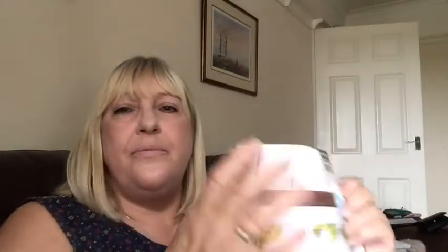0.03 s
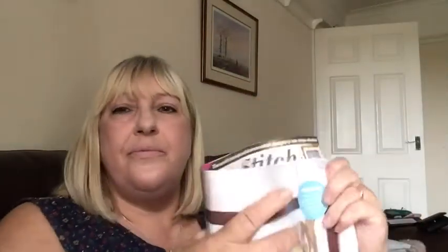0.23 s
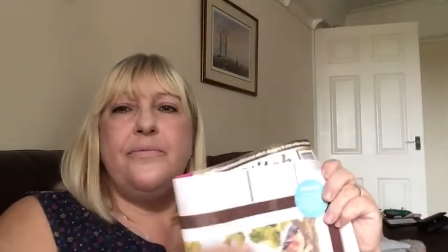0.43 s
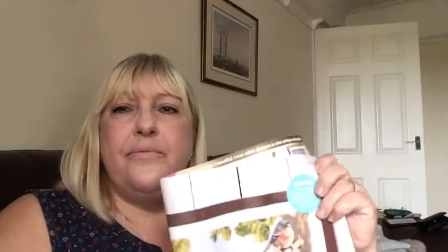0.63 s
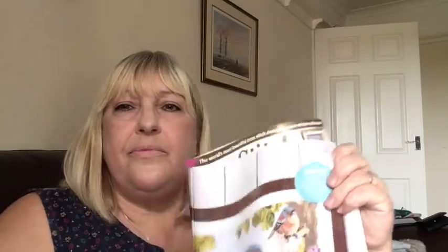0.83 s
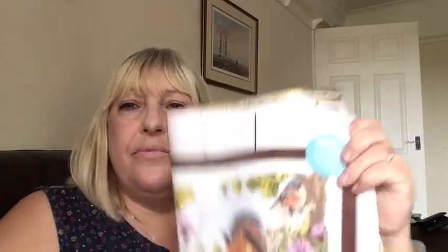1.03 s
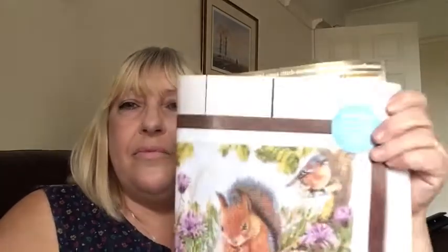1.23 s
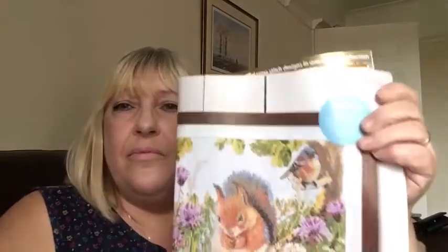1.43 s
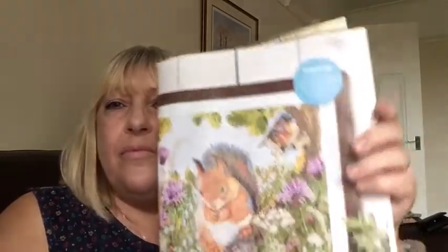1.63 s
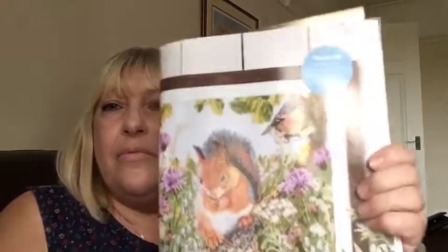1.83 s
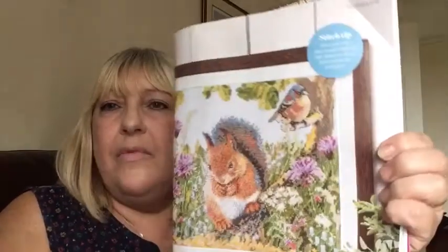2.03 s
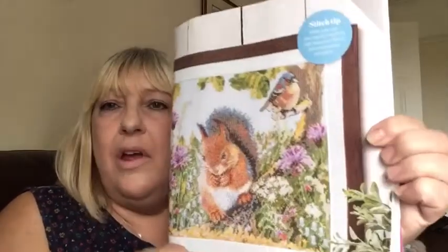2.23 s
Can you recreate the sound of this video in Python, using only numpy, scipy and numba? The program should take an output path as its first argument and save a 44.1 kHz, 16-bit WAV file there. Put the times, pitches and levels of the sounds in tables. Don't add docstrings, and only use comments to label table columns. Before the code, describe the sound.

Glossy magazine handled and turned over, cover popping and crackling, fingers sliding, in a small room

```python
import sys
import numpy as np
from scipy import signal
from scipy.fft import rfft, irfft
from scipy.io import wavfile
from scipy.ndimage import uniform_filter1d
from numba import njit

SR = 44100
rng = np.random.default_rng(int(sys.argv[2]) if len(sys.argv) > 2 else 0)


def dump_mix(stems):
    frames = np.atleast_2d(stems).T
    limited = np.clip(frames, -1, 1)
    pcm = np.round(limited * 32767).astype(np.int16)
    wavfile.write(sys.argv[1], SR, pcm)


def field_ratio(decibels):
    return 10 ** (np.asarray(decibels, dtype=float) / 20)


N = 100283

# (time [s], resonance [Hz])
SHEET_NOTE = [
    (.2,600),
    (.33,525),
    (.5,703),
    (1.0,720),
    (1.15,590),
]


def level(x):
    return x / np.sqrt(np.mean(x ** 2))


@njit
def svf(x, hz, ratio):
    y, band_state, low_state = np.empty(len(x)), 0., 0.
    for i in range(len(x)):
        g = np.tan(np.pi * hz[i] / SR)
        v = (band_state + g * (x[i] - low_state)) / (1 + g * (g + ratio))
        band_state = 2 * v - band_state
        low_state = low_state + 2 * g * v
        y[i] = ratio * v
    return y


def band(x, hz, ratio):
    hz = np.clip(hz + np.zeros(len(x)), 20, 0.42 * SR)
    once = svf(x, hz, float(ratio))
    return svf(once, hz, float(ratio))


def colour(x, table):
    f = np.fft.rfftfreq(len(x), 1 / SR) + 1
    hz, db = np.array(table).T
    gain = field_ratio(np.interp(np.log(f), np.log(hz), db))
    return level(irfft(rfft(x) * gain, len(x)))


def curve(table, axis):
    table = np.array(table)
    return np.interp(np.arange(N) / SR, table[:, 0], table[:, axis])


def walk(rate):
    k = int(SR / rate)
    steps = np.repeat(rng.standard_normal(N // k + 1), k)
    return 1.7 * uniform_filter1d(uniform_filter1d(steps, k), k)[:N]


def grit(scatter_db):
    return level(rng.standard_normal(N) * field_ratio(scatter_db * rng.exponential(size=N)))


def add(out, s, x):
    i = int(s * SR)
    out[i:i + len(x)] += x[:N - i]


def bursts(table, scatter_db, attack_share):
    snap_hz, treble_hz = 4350, 9440
    out, t = np.zeros(N), np.arange(3000) / SR
    chance = rng.standard_normal((len(table), 2, len(t)))
    for (s, db, treble_db, ms), (slips, size) in zip(table, chance):
        tau = max(ms, 0.2) / 1000
        swell = 1 - np.exp(-t / (attack_share * tau))
        run = slips * field_ratio(scatter_db * size) * swell * np.exp(-t / tau)
        mid = band(run, snap_hz * 2 ** np.clip(treble_db / 30, -1, 0.5), 2.1)
        top = band(run, treble_hz * 2 ** np.clip(treble_db / 20, 0, 0.5), 1.3)
        mid, top = mid / np.abs(mid).max(), top / np.abs(top).max()
        add(out, s, field_ratio(db) * (mid + field_ratio(treble_db - 0.5) * top))
    return out


def room_air():
    # (frequency [Hz], level [dB per Hz])
    air_colour = [(15, -37), (25, 7.5), (117, 0), (317, -0.5), (1260, -29), (2760, -10.5), (6050, -25),
                  (12200, -25), (16000, -67)]
    return colour(rng.standard_normal(N), air_colour) * field_ratio(-61)


def flex():
    # (time [s], level [dB], centre [octaves above 500 Hz])
    bending = [(0,-52.5,0.6),(.12,-56.5,1.2),(.21,-62,0.3),(.27,-49.5,1.18),(.36,-62,1.25),(.52,-60,0.22),(.6,-57.5,0.64),(.68,-77,1.3),(.8,-67,0.24),(.9,-53,1.6),(1.01,-65,1.44),(1.15,-65,0.56),(1.25,-58,1.7),(1.3,-70.5,1.3),(1.6,-68.5,0.72),(1.8,-76,0.58),(2.1,-67.5,0.7),(2.27,-73.5,0.77)]
    hz, slips = 500 * 2 ** curve(bending, axis=2), grit(1.58)
    wide = level(band(slips, hz * 2 ** (0.057 * walk(24.6)), 1.2))
    ring_hz = curve(SHEET_NOTE, axis=1) * 2 ** (0.06 * walk(10))
    ring = level(band(slips, ring_hz, 0.25)) * field_ratio(-5)
    thud = level(band(grit(3), 150, 1.4)) * field_ratio(-3)
    crackle = wide * field_ratio(2 * walk(50)) + ring * field_ratio(2 * walk(35)) + thud * field_ratio(2 * walk(25))
    return field_ratio(curve(bending, axis=1)) * crackle


def pops():
    # (time [s], peak level [dB], centre [Hz], ring [ms], bass share [dB])
    buckles = [(.001,-43,154.6,18,-16),(0.0422,-32,1400,5.16,-6),(0.062,-36.5,395,7.5,-17),(0.1596,-39,610,12.2,-23),(0.1799,-32,608,6.4,-2),(.2405,-36.5,497,12,12),(0.3201,-19,567.6,4.98,-18.5),(.4605,-36.5,683,13,-5),(0.5567,-25.5,893,6.5,-0.5),(.5895,-36,734,5.7,-2),(.8164,-14.5,1535,4.39,-12),(0.8508,-31.5,1284,12.6,-6),(.8817,-19,1342,4.7,-16.5),(.9122,-32.5,1116,2.92,1),(1.0623,-39,1450,5,-4),(1.0934,-37,708,7.2,20.5),(1.1802,-38,574,10,-12),(1.2177,-36.5,546,15,-6),(1.3363,-42,384,6.7,0),(1.3903,-33.5,2630,1.467,0.5),(1.5123,-45.5,394,4.9,4),(1.5551,-41,580,7.7,7),(2.1099,-41,1770,5.2,-7),(2.2203,-50.5,192,7.4,-24)]
    spread_oct, bass_hz, bass_oct = 0.56, 205, 1.93
    lag_cycles, tail_db, tail_s, tail_rise_s = 2.5, -26, 0.024, 0.0056
    out, t, f = np.zeros(N), np.arange(8192) / SR, np.fft.rfftfreq(8192, 1 / SR) + 1
    chance = rng.random((len(buckles), 2, 14, 1))
    flutter = rng.standard_normal((len(buckles), len(t)))
    is_echo = np.arange(14)[:, None] > 0

    def hump(centre_hz, octaves):
        return np.exp(-(np.log2(f / centre_hz) / octaves) ** 2 / 2)

    for (s, db, hz, ms, bass_db), (place, sign), noise in zip(buckles, chance, flutter):
        bend = f / np.interp(s, *np.array(SHEET_NOTE).T)
        sheet = field_ratio(-0.5) / (1 + 7j * (bend - 1 / bend))
        lag = lag_cycles / hz
        late = ms / 400 * place ** 2 * is_echo
        size = np.where(late > 0, (2 * sign - 1) * np.exp(-late * 1000 / ms), 1)
        paths = np.sum(size * np.exp(-4j * np.pi * (lag + late) * np.sqrt(hz * f)), axis=0)
        body = hump(hz, spread_oct) * (1 + sheet)
        bass = field_ratio(bass_db + 2.5) * hump(bass_hz, bass_oct)
        ring = irfft(paths * (body + bass))
        since = np.maximum(t - lag, 0)
        fade = np.exp(-since / tail_s) * (1 - np.exp(-since / tail_rise_s))
        tail = level(band(noise ** 3, hz, 1.56)) * fade
        pop = ring / np.abs(ring).max() + field_ratio(tail_db) * tail
        add(out, max(s - lag, 0), field_ratio(db) * pop[:6000])
    return out


def snaps():
    # (time [s], peak level [dB], treble share [dB], length [ms])
    creases = [(.0212,-34,-14,2.2),(.0585,-34.5,-33,2.4),(.096,-36,-8,0.82),(.128,-38.5,-33,2.8),(.178,-42,-38,1.5),(.1875,-31.5,-16,1.7),(.236,-31.5,1,0.49),(.319,-38,-45,4.1),(.4718,-35,-10,1.7),(.5957,-35.5,-8,1.5),(.8158,-32,-21,1.8),(.8815,-53,-34,0.45),(.9114,-35.5,-11,.6),(1.0938,-32.5,-15.5,1.8),(1.1591,-59,1,0.73),(1.3378,-37,-22,1.06),(1.3899,-45,-36,0.71),(1.4335,-42,15,1.2),(1.4527,-28,-1,2.9),(1.4594,-46,14,0.61),(1.4638,-36,-11,0.38),(1.4848,-31.5,-3,0.96),(1.4878,-32,0.5,1.1),(1.4926,-40.5,19.5,0.4),(1.5083,-36.5,-0.5,1.6),(1.5163,-26.5,-28,0.24),(1.522,-41,7,.6),(1.6655,-39,-10,1.2),(1.8512,-46.5,-16,1.2),(1.9415,-42.5,-30,1.4)]
    return bursts(creases, 4.5, 0.2)


def slide():
    # (time of peak [s], level [dB], rise [ms], fall [ms], dull share [dB])
    strokes = [(.03,-60.5,30,29,12.5),(0.256,-51,20.4,52,10.5),(0.471,-56.5,55,44,12.5),(.57,-49.5,45,19,1),(.62,-56.5,22,12,6),(0.778,-54,33,24,7),(.85,-83.5,24,160,30),(.94,-57.5,12,38,9.5),(1.036,-65.5,3.4,6.8,23.5),(1.12,-65,11,24,20),(1.246,-52,33.5,11.7,9.5),(1.35,-66,16,12,16.5),(1.53,-57,35,33,10),(1.657,-56.5,30,30,11),(1.76,-60.5,15,14,9),(1.9,-72.5,140,140,8),(2.093,-57.5,22.6,30.6,9),(2.22,-68.5,18,51,5)]
    # (frequency [Hz], level [dB per Hz])
    hiss_colour = [(880, -10.5), (1500, 2.5), (2770, -5.5), (3480, -5), (7320, -3), (10800, -2.5),
                   (13800, -3), (16000, -12.5)]
    dull_hz = 3590
    ms, wide, palm = np.arange(N) / SR * 1000, 0, 0
    for s, db, rise, fall, dull_db in strokes:
        away = ms - s * 1000
        pace = np.where(away < 0, max(rise, 2), max(fall, 2))
        power = field_ratio(2 * db) * np.exp(-np.abs(away) / pace)
        wide = wide + power
        palm = palm + power * field_ratio(2 * dull_db)
    bright = colour(grit(1.5), hiss_colour) * field_ratio(walk(60) + 3.5)
    moving_hz = dull_hz * 2 ** (0.29 * walk(12.96))
    dull = level(band(grit(2.2), moving_hz, 0.92)) * field_ratio(walk(49.06) - 8)
    wide, palm = uniform_filter1d(wide, size=700), uniform_filter1d(palm, size=700)
    return np.sqrt(wide) * bright + np.sqrt(palm) * dull


def ripples():
    # (time of peak [s], peak level [dB], centre [Hz], half length [ms])
    waves = [(0.1283,-37,2840,0.58),(.1635,-38.5,610,3.7),(0.065,-43,1030,1.5),(.3295,-37,706,1.5),(.349,-39,746,4),(.474,-39,710,2.2),(0.557,-36.5,457,2.06),(.5645,-32.5,890,1.3),(.5795,-56,920,0.93),(.5855,-36,780,0.7),(.598,-41,460,0.99),(.5965,-36,1250,1.7),(.8165,-32.5,3630,1.1),(.8195,-23,1510,0.73),(.825,-31,880,1.04),(.855,-45,1730,2.5),(.8675,-42,2050,1.7),(.8815,-25.5,2750,0.44),(.8855,-32.5,2020,0.83),(.8875,-38,534,2.3),(0.8232,-31.5,422,1.7),(.9125,-36,910,0.3),(1.1835,-42,1600,.3),(1.2195,-45,1470,0.42),(1.232,-45,666,3.5),(1.254,-41.5,784,0.25),(1.3905,-34.5,2740,0.76),(1.391,-43,745,1.04),(1.4545,-39,1500,0.49),(1.454,-39,4350,1.3),(1.455,-44,500,0.92),(2.086,-49,3140,0.69),(2.088,-41,288,1),(2.0935,-52,2620,1.1),(2.108,-36,2040,0.54),(2.112,-36.5,2800,0.79),(2.1117,-41,1640,1.8),(2.1054,-38,2620,.8)]
    sag = 0.074
    out, t = np.zeros(N), np.arange(-512, 512) / SR
    for (s, db, hz, ms), turn in zip(waves, rng.random(len(waves))):
        u = t * 1000 / max(ms, 0.1)
        swell = np.exp(-u ** 2 / 2 * (1 + 2 * (u < 0)))
        cycles = turn + hz * t * (1 - sag * np.tanh(u / 2))
        add(out, s + t[0], field_ratio(db) * swell * np.sin(2 * np.pi * cycles))
    return out


def scuffs():
    # (time [s], peak level [dB], treble share [dB], length [ms])
    skids = [(.097,-40,-4.5,6.4),(.188,-50,7,12),(1.095,-39,-9,3.9),(1.1785,-30,-17,6),(1.19,-38,-1.5,13),(1.2162,-24.5,-6,5),(1.223,-34.5,4,6.8),(1.455,-49,7,17),(1.487,-55,13,16),(2.078,-39,-29,20),(2.0925,-39,-9,7.2),(2.1075,-34.5,-1.5,4.1)]
    return bursts(skids, 5, 0.3)


def ticks():
    # (time [s], peak level [dB], treble share [dB], length [ms])
    more_creases = [(.157,-44,-12,1.4),(.528,-39,-17,1),(1.0306,-51,-20,1.9),(1.2151,-24,-16,0.47),(1.2176,-23.5,-1,1.7),(1.2345,-37,-17,0.7),(1.2418,-42,4,1),(1.503,-55,5,.8),(1.5335,-43,6,.4),(2.084,-45.5,-4,5),(2.098,-47,5,1.5),(2.1043,-39,-2,.6),(2.11,-39,-12,0.64),(2.196,-56.5,5,1.2)]
    return bursts(more_creases, 4.5, 0.2)


def room(x):
    t60_s, echo_db, top_hz = 0.37, -15.5, 5000
    t = np.arange(SR // 2) / SR
    fade = np.exp(-np.log(1000) * t / t60_s) * (t > 0.004)
    tail = rng.standard_normal(len(t)) * fade
    tail = signal.lfilter(*signal.butter(1, top_hz, fs=SR), tail)
    return signal.fftconvolve(x, tail / np.sqrt(np.sum(tail ** 2)))[:N] * field_ratio(echo_db)


def scene():
    air = room_air()
    paper = flex() + pops() + snaps() + slide() + ripples() + scuffs() + ticks()
    return np.tile(paper + room(paper) + air, (2, 1))


def band_limit(x):
    return signal.sosfilt(signal.butter(12, 16500, fs=SR, output="sos"), x)


def record(dry):
    low_cut = signal.butter(4, 55, "high", fs=SR, output="sos")
    top_cut = signal.ellip(10, 1, 45, 15750, fs=SR, output="sos")
    thin = signal.sosfilt(low_cut, dry)
    return band_limit(signal.sosfilt(top_cut, thin))


dry = scene()
out = record(dry)
dump_mix(out)
```